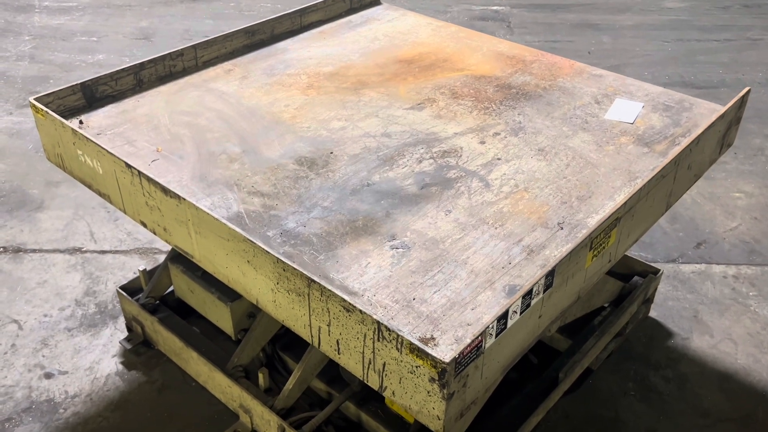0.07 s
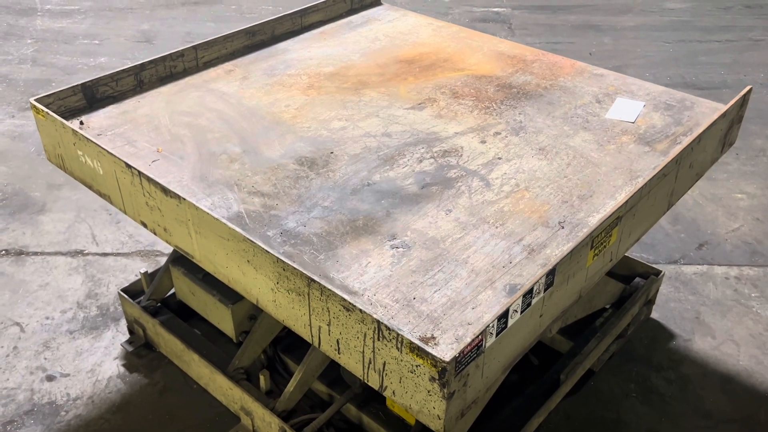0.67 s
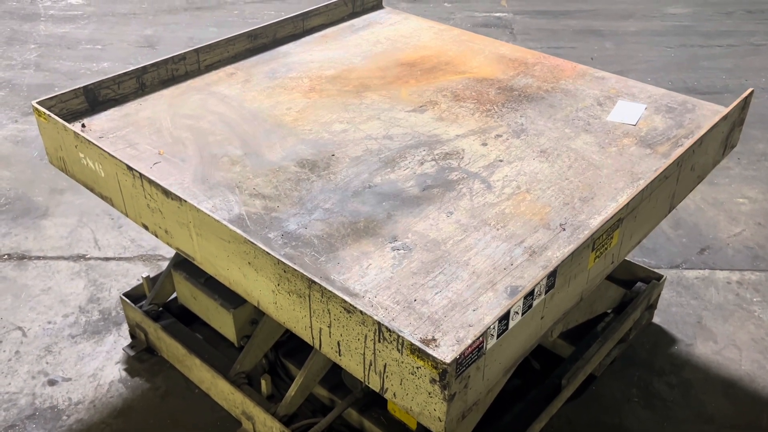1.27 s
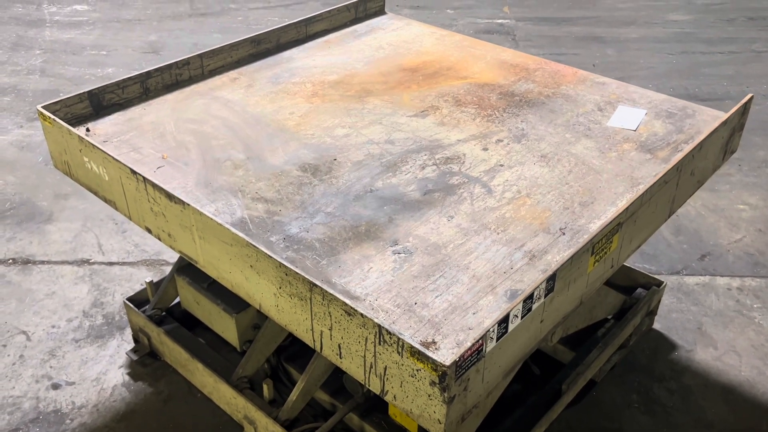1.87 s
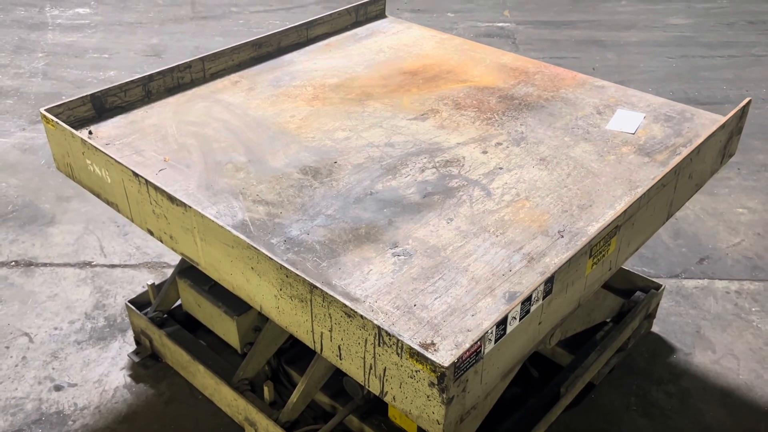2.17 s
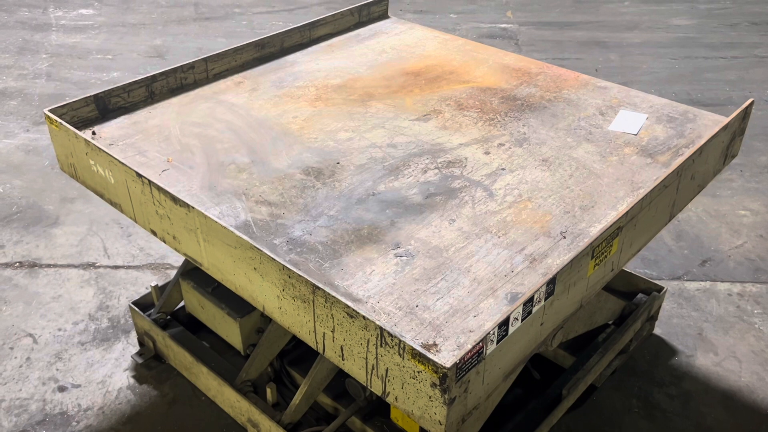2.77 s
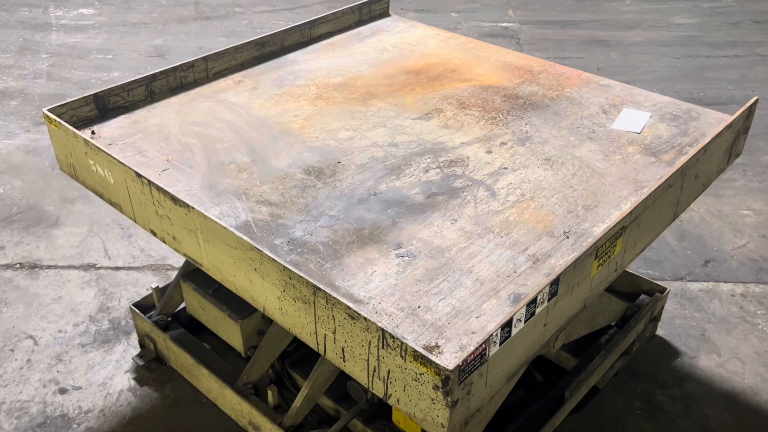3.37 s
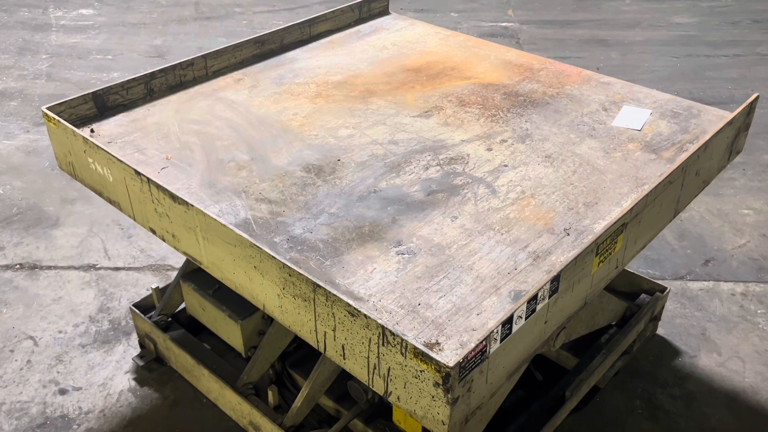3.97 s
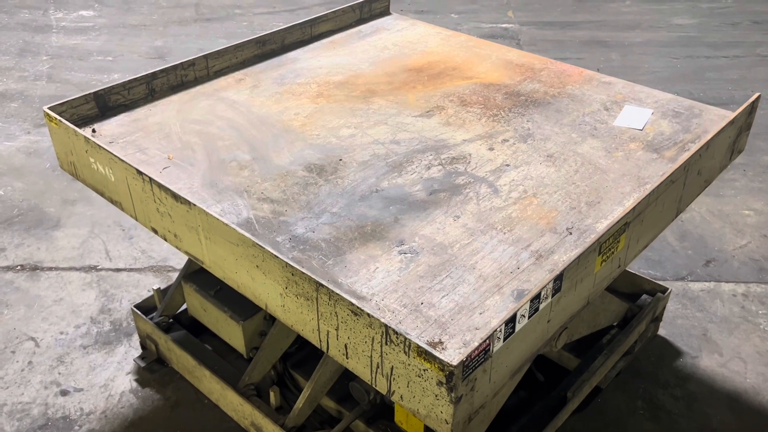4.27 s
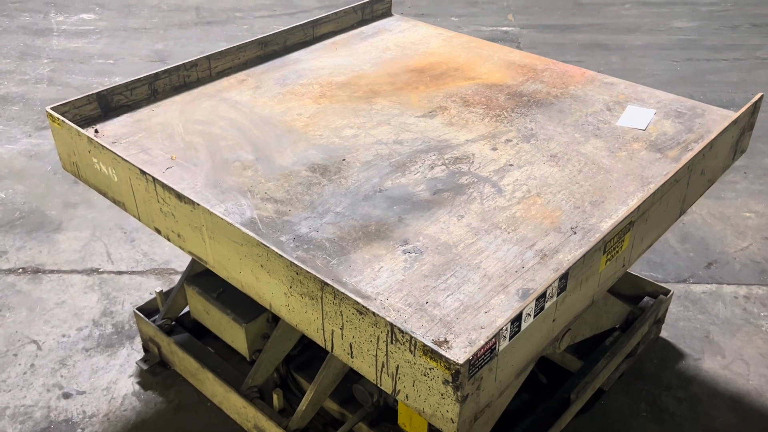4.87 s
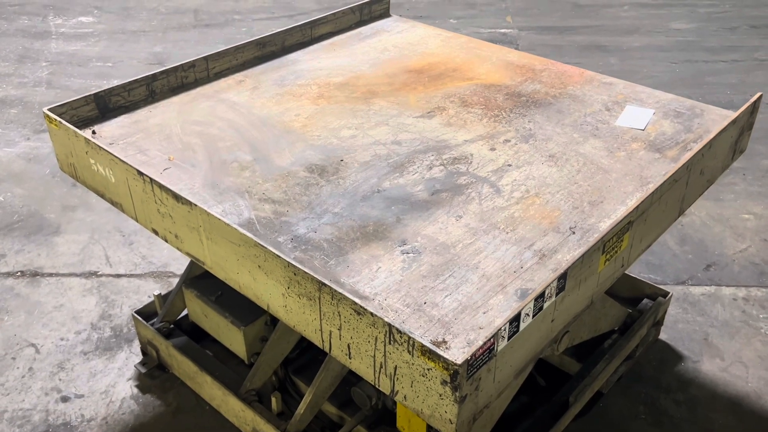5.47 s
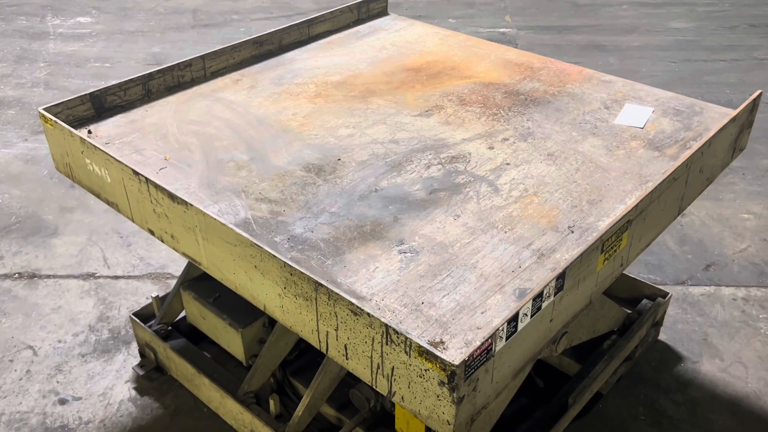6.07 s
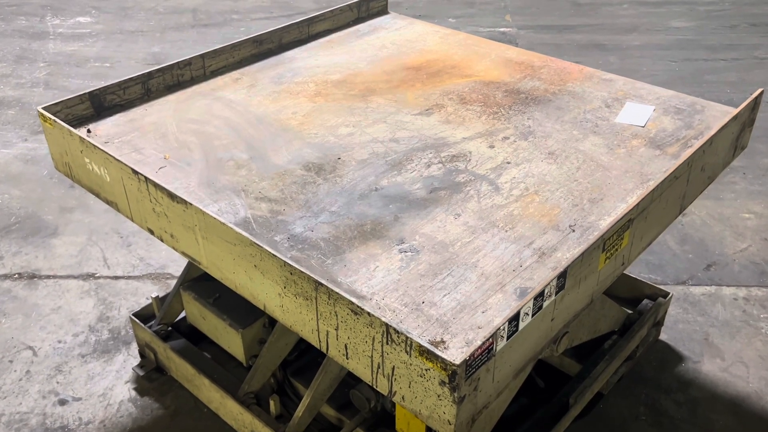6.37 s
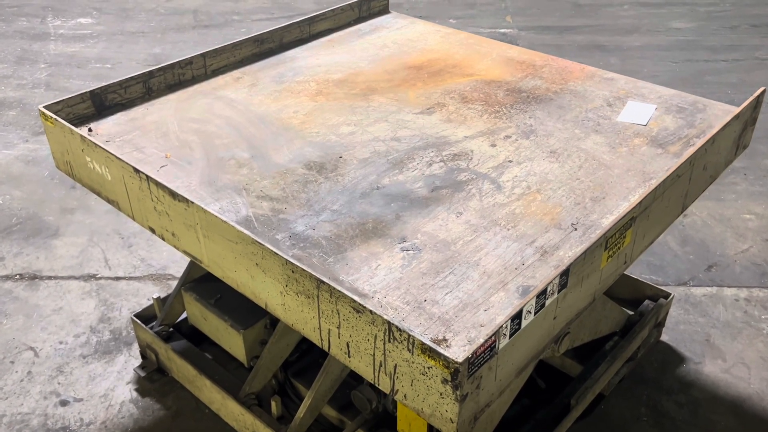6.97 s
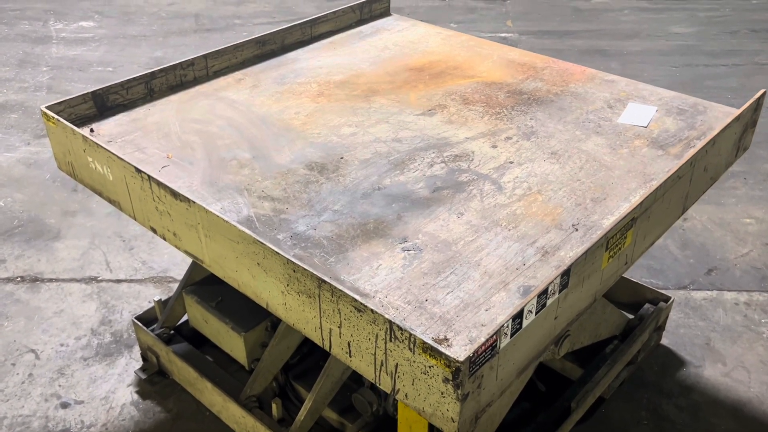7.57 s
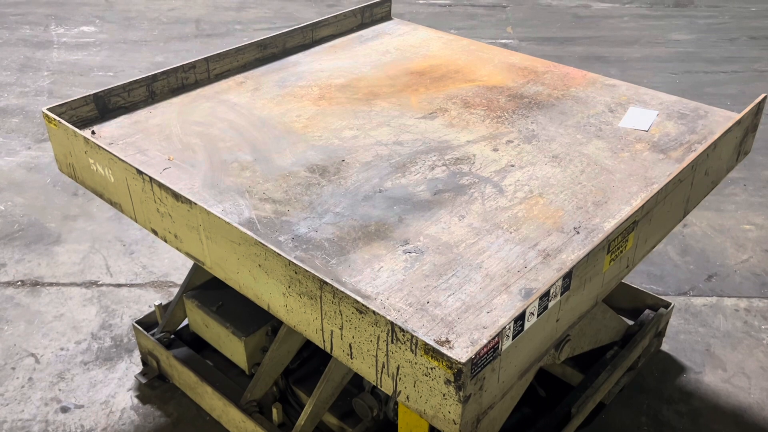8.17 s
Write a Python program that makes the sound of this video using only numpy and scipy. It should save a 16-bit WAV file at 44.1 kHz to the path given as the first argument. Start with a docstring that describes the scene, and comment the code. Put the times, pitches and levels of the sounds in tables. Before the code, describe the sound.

Heard in stereo from nearby, a scissor lift's hydraulic pump gives a continuous humming drone with a buzzing edge and a slight shaft rattle. A constant hiss of flowing oil sits on top, with faint high squeals swelling and fading in the pipes. The pitch barely changes and the machine never stops. Behind it lies the low, soft rush of a concrete hall.

```python
"""A concrete hall, with a stereo microphone near a steel scissor lift whose table creeps upward.
Its hydraulic power pack runs steadily. The pump gives four pressure strokes a turn:
they drone in the frame and buzz in the housing, over a faint rattle from the shaft.
Oil hisses through the valve and whistles in the pipes; farther back, the hall hums faintly."""
import sys
import numpy as np
from scipy import signal
from scipy.fft import rfft, irfft, next_fast_len
from scipy.io import wavfile
from scipy.ndimage import uniform_filter1d, map_coordinates

SR = 44100
rng = np.random.default_rng(int(sys.argv[2]) if len(sys.argv) > 2 else 0)


def persist_wave(psi):
    """Save psi, clipped to +-1, as 16-bit WAV."""
    counts = np.round(np.clip(psi, -1, 1) * 32767).astype(np.int16)
    wavfile.write(sys.argv[1], SR, np.atleast_2d(counts).T)


N = 362943


def amp(db):
    """Decibels to gain."""
    return 10 ** (np.asarray(db) / 20)


def unit(x):
    """Scale to rms 1."""
    return x / np.sqrt(np.mean(x ** 2) + 1e-20)


def curve(rows, t):
    """(seconds, value) points joined by straight lines."""
    return np.interp(t, *np.transpose(rows))


def along(points, hz):
    """(Hz, value) points read on a log frequency axis."""
    freqs, values = np.transpose(points)
    return np.interp(np.log(hz + 1), np.log(freqs + 1), values)


def wobble(rate):
    """A smooth random curve, rate knots a second."""
    coarse = np.arange(0, N + 64, 64)
    knots = rng.standard_normal(int(N * rate / SR) + 4)
    smooth = map_coordinates(knots, [coarse * rate / SR], mode="nearest")
    return np.interp(np.arange(N), coarse, smooth)


def filtered(x, response):
    """Pass x through a complex response of frequency."""
    size = next_fast_len(N + SR // 4)
    return irfft(rfft(x, size) * response(np.fft.rfftfreq(size, 1 / SR)), size)[..., :N]


def resonance(f, hz, width):
    """Response of one damped mode."""
    return 1j * f * width / (hz * hz - f * f + 1j * f * width)


# Diffuse sound at the microphone's two ports. Each row: frequency in Hz, likeness from 0 to 1.
PORT_LIKENESS = [(60, 1), (200, 0.3), (1000, 0), (2200, 0.72), (4500, 0.62), (6000, 0.52), (7000, 1),
                 (10000, 1)]

def diffuse_noise(colour):
    """Coloured stereo noise of rms 1, partly alike at the two ports."""
    def response(hz):
        spread = np.arccos(np.clip(along(PORT_LIKENESS, hz), -1, 1)) / 2
        return colour(hz) * np.array([np.cos(spread), np.sin(spread)])
    mid, side = filtered(rng.standard_normal((2, N)), response)
    return unit(np.array([mid + side, mid - side]))


# Room tone of machine and hall, all around. Each row: frequency in Hz, relative density in dB.
ROOM_TONE = [(20, -22), (33, -8), (55, -12), (130, -0.5), (270, -5), (400, 1.5), (650, 2.5), (900, -5.5),
             (1250, -5), (1650, -14), (3000, -34)]
# Hums from farther back in the hall. Each row: frequency in Hz, level in dB.
HALL_HUMS = [(49.5, -74.5), (65.5, -60), (120, -76), (182.5, -62.5)]

def hall(t, rush_db=-47.5):
    """A low rush fills the hall, with a few wavering hums."""
    hums = 0
    for hz, db in HALL_HUMS:
        peak = np.sqrt(2) * amp(db + 1.9 * wobble(3))
        hums += peak * np.sin(2 * np.pi * hz * t + 0.46 * wobble(4.3))
    rush = amp(rush_db + .6 * wobble(13)) * diffuse_noise(lambda hz: amp(along(ROOM_TONE, hz)))
    return hums + rush


def whistle(hz, width, flutter_db):
    """Turbulence rings one resonance in fitful bursts."""
    flutter = amp(flutter_db * (0.26 * wobble(4.6) + 0.88 * wobble(28)))
    ring = diffuse_noise(lambda f: resonance(f, hz, width * np.sqrt(2)) ** 2)
    return unit(flutter * ring)


# A high squeal from the lift's pipes. Each row: start in seconds, hold in seconds, level in dB.
PIPE_SQUEALS = [(0.05, 0.5, -55), (1.5, .9, -58), (2.852, .5, -59), (3.9, 0.56, -64), (5.5, .75, -57)]

def pipe_squeal(t, hz=6438, width_hz=45, attack_s=0.09, fade_db_per_s=7):
    """One pipe resonance catches quickly, holds and fades slowly."""
    envelope = np.zeros(N)
    for start, hold, db in PIPE_SQUEALS:
        rise = np.clip((t - start) / attack_s, 0, 1)
        fade_db = fade_db_per_s * np.maximum(t - start - hold, 0)
        envelope = np.maximum(envelope, rise * amp(db - fade_db))
    return envelope * whistle(hz, width_hz, flutter_db=2)


def shimmer(x, depth_db, size=2048):
    """Narrow bands of a noise swell and sink slowly, each on its own."""
    bands = signal.stft(x, nperseg=size)[2]
    swell = uniform_filter1d(rng.standard_normal(bands.shape[1:]), size=2, axis=0)
    swell = uniform_filter1d(swell, size=70, axis=1)
    return unit(signal.istft(bands * amp(depth_db * unit(swell)), nperseg=size)[1][:, :N])


# Oil rushing through the valve. Each row: frequency in Hz, relative density in dB.
VALVE_HISS = [(900, -18), (1700, -12), (2400, 0.5), (3200, -6.5), (4000, -7.5), (5300, -2), (6200, -3),
              (7250, -5.5), (7800, -1.5), (8800, 3), (9600, -11.5), (11500, -2), (13500, -5), (15700, -9.5)]
# Steady rings of valve and pipes.
# Each row: frequency in Hz, nominal width in Hz, level in dB before the boost, flutter in dB.
PIPE_RINGS = [(3680, 140, -65.5, 3), (3850, 40, -68, 3), (4530, 140, -62, 2), (4930, 160, -66, 2.5),
              (5560, 36, -63.5, 2), (5825, 36, -63.5, 2), (5910, 45, -58.5, 1.5), (5960, 320, -60.5, 1.5),
              (8350, 350, -59, 2.5), (11300, 200, -60, 2.5), (12030, 280, -61, 2.5), (12800, 200, -62, 2.5)]

def oil_flow(t, turns, hiss_db=-45, ring_boost_db=2.8, turn_db=0.34, stroke_db=0.4, spit_db=1.04):
    """Oil hisses in the valve and whistles in the pipes, pulsing with each turn and each stroke."""
    pulse_db = turn_db * np.cos(2 * np.pi * (turns - .2))
    pulse_db += stroke_db * np.cos(2 * np.pi * len(STROKE_DB) * turns)
    hiss = shimmer(diffuse_noise(lambda hz: amp(along(VALVE_HISS, hz))), depth_db=3)
    hiss *= amp(hiss_db + 0.54 * wobble(5.5) + spit_db * wobble(120))
    rings = sum(amp(db + ring_boost_db) * whistle(hz, width, flutter_db)
                for hz, width, db, flutter_db in PIPE_RINGS)
    return (hiss + rings + pipe_squeal(t)) * amp(pulse_db)


# The shaft's faint rattle, under the drone. Each row: frequency in Hz, level of an order there in dB.
RATTLE_SPECTRUM = [(55, -68), (150, -63.5), (260, -65), (420, -61), (650, -63.5), (900, -70.5), (1220, -66),
                   (1400, -84.5), (1700, -93)]

def shaft_rattle(turns, shaft_hz, scatter_db=2, size=4096):
    """Play in shaft and coupling repeats every turn and fills in the weak orders."""
    orders = np.setdiff1d(np.arange(2, 60), [round(row[0]) for row in FRAME_ORDERS])
    angle = np.arange(size) / size
    levels_db = along(RATTLE_SPECTRUM, orders * shaft_hz) + scatter_db * rng.standard_normal(len(orders))
    cycles = np.outer(orders, angle) + rng.random((len(orders), 1))
    one_turn = np.sqrt(2) * amp(levels_db) @ np.cos(2 * np.pi * cycles)
    return np.interp(turns % 1, angle, one_turn) * amp(1.6 * wobble(5.9))


# The pump's four strokes in one turn. Each entry: relative strength in dB.
STROKE_DB = [0, -.5, -4, -2.5]
# The ring of the pump housing. Each row: frequency in Hz, relative gain in dB.
HOUSING_RING = [(1300, -43), (1650, -31), (1830, -0.5), (2100, -8.5), (2450, 3), (2700, 2), (2900, -17),
                (3800, -5.5), (4500, -2.5), (6500, -32.5)]
# The buzz at the microphone, easing off for a while. Each row: time in seconds, dB before the trim.
BUZZ_LEVEL = [(0, -57), (1, -54), (2.1, -58.5), (3.5, -56.5), (3.8, -55), (7.4, -54.5), (8.2, -57)]

def housing_buzz(t, turns, trim_db=-1, scatter_db=0.8, t60_s=0.02, stereo_width=0.19):
    """Each stroke ticks against the pump housing; unequal strokes make the buzz rasp."""
    per_turn = len(STROKE_DB)
    stroke = np.arange(int(turns[-1] * per_turn))
    at_sample = np.interp(stroke / per_turn, turns, np.arange(N))
    force = amp(np.take(STROKE_DB, stroke % per_turn) + scatter_db * rng.standard_normal(len(stroke)))
    # each tick is shared between two neighbouring samples
    whole, part = at_sample.astype(int), at_sample % 1
    ticks = np.bincount(whole, force * (1 - part), N + 1) + np.bincount(whole + 1, force * part, N + 1)
    age = np.arange(SR // 20) / SR
    mid, side = rng.standard_normal((2, len(age))) * amp(-60 * age / t60_s)
    tail = np.array([mid + stereo_width * side, mid - stereo_width * side])
    rasp = signal.fftconvolve(ticks[None], tail, axes=1)[:, :N]
    buzz = unit(filtered(rasp, lambda hz: amp(along(HOUSING_RING, hz))))
    return amp(curve(BUZZ_LEVEL, t) + trim_db) * buzz


# The frame's drone, in the foreground, drifting as the table rises. Each row: shaft order,
# base level at half time in dB, drift in dB per second, left over right in dB.
FRAME_ORDERS = [(4, -37.4, -.28, 1), (8, -39.9, .65, .5), (12, -33.9, 0, 5.1), (16, -39.1, -.92, -1.4),
                (17, -46, .9, .5), (20, -37.4, .3, 0), (21, -46.4, -.5, -.6), (23, -54.3, .55, 9),
                (24, -47.4, -1.05, 1), (28, -46.2, .1, 5), (32, -55.8, -1.3, 0), (36, -53, .6, 3.5),
                (40, -54.2, 0, 2), (43, -58.7, -.6, -3.7), (48, -62, .5, -3.5), (52, -64.3, 1.8, .5)]
# Orders on the flank of a frame resonance swell or sink with the shaft speed.
# Each row: shaft order, change in dB for one more turn a second.
RESONANCE_FLANKS = [(4, 13), (12, 7), (16, -17), (20, -10), (28, 28)]
# A narrow cancellation climbs as the table rises. Each row: time in seconds, centre in Hz.
NOTCH_PATH = [(0.2, 780), (1.4, 1010), (4, 1230), (7.5, 1370)]

def frame_drone(t, turns, speed, notch_db=-11.5, notch_half_width_hz=63, bending=2.7, skew=1.15):
    """Strokes drone in the frame; steel carries highs faster, so each arrives as a falling chirp."""
    excess_speed = speed - speed.mean()
    flanks = {round(order): slope for order, slope in RESONANCE_FLANKS}
    notch_hz = curve(NOTCH_PATH, t)
    drone = np.zeros((2, N))
    for order, db, drift, pan_db in FRAME_ORDERS:
        hz = order * speed.mean()
        # the strokes of a turn are uneven, so the orders between their harmonics lag behind
        phase = np.pi - bending * np.sqrt(hz) - skew * (order % len(STROKE_DB))
        # shorter waves differ more between the microphone's ports
        port_phase = np.array([[1], [-1]]) * min((hz / 1350) ** 2, 1) * rng.choice([-1, 1]) / 2
        level_db = db + drift * (t - t.mean()) + flanks.get(order, 0) * excess_speed
        level_db += notch_db / (1 + ((hz - notch_hz) / notch_half_width_hz) ** 2)
        level_db += 0.27 * np.sqrt(order / len(STROKE_DB)) * wobble(2.484)  # high orders wander more
        pan = amp([[pan_db / 2], [-pan_db / 2]])
        tone = np.sqrt(2) * np.cos(2 * np.pi * order * turns + phase + port_phase)
        drone += amp(level_db) * pan * tone
    return drone * amp(0.1654 * wobble(30))  # a slight, fast tremble


# The pump shaft sags slowly and falters once. Each row: time in seconds, speed in turns a second.
SHAFT_SPEED = [(0.2, 28.38), (1.6, 28.305), (5.1, 28.305), (5.32, 28.36), (5.57, 28.21), (5.8, 28.34),
               (6.1, 28.22), (8.2, 28.24)]

def scene():
    """One shaft drives drone, rattle, buzz and oil flow, with the hall behind them."""
    t = np.arange(N) / SR
    speed = curve(SHAFT_SPEED, t) + .012 * wobble(7)
    turns = np.cumsum(speed) / SR
    pump = frame_drone(t, turns, speed) + shaft_rattle(turns, speed.mean()) + housing_buzz(t, turns)
    return pump + oil_flow(t, turns) + hall(t)


# The microphone's left port leads its right. Each row: frequency in Hz, phase lead in radians.
PORT_LEAD = [(7200, 0), (8500, 1.5), (9200, 2.9), (10600, 3.4), (11300, 4.7), (12400, 6.1), (13400, 6.5),
             (14300, 7.8), (15200, 8.2)]
TOP_HZ = 15400

def record(dry):
    """The microphone's two ports hear the treble out of step; nothing passes the band limit."""
    def response(hz):
        return np.exp(.5j * np.outer([1, -1], along(PORT_LEAD, hz))) * (hz < TOP_HZ)
    return filtered(dry, response)


dry = scene()
out = record(dry)
persist_wave(out)
```